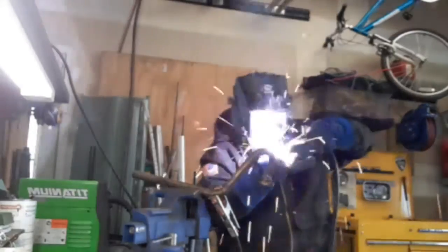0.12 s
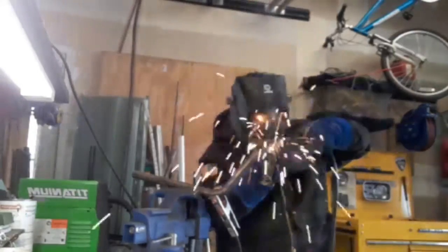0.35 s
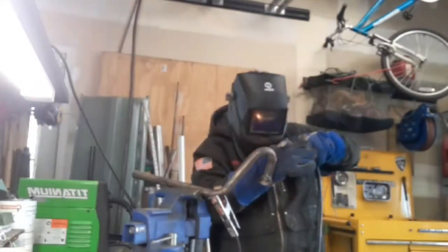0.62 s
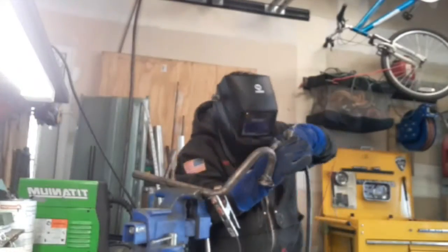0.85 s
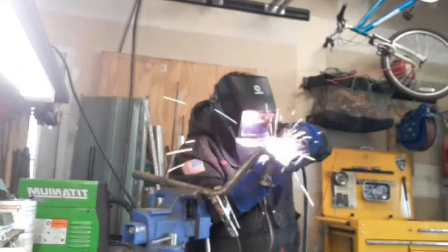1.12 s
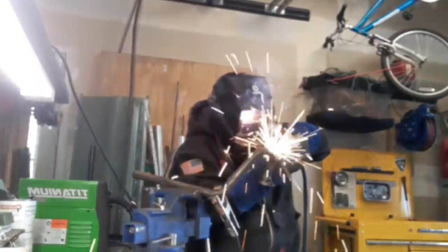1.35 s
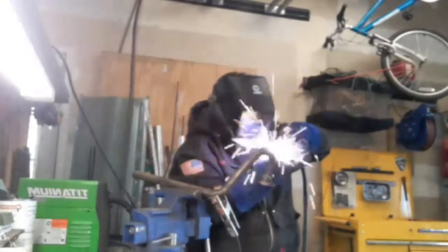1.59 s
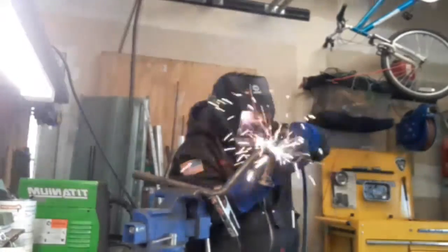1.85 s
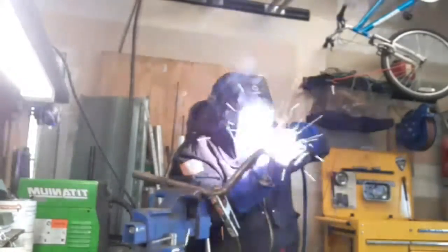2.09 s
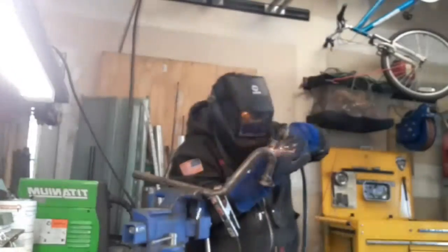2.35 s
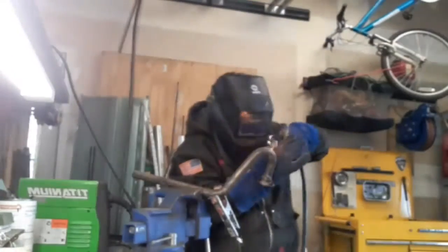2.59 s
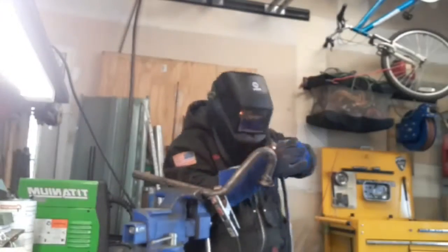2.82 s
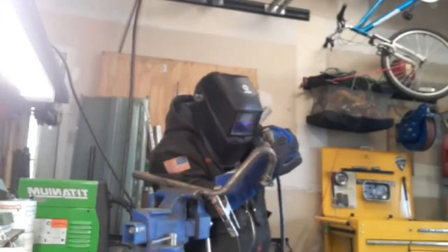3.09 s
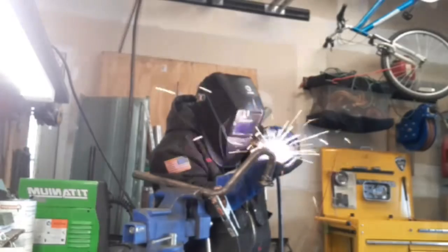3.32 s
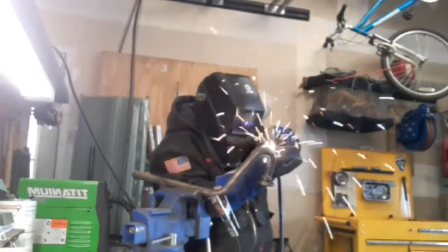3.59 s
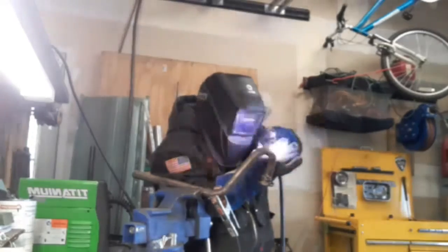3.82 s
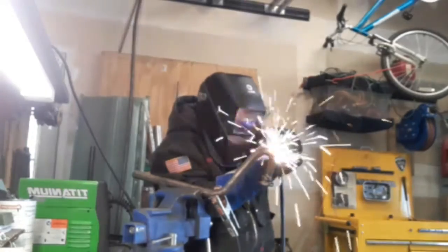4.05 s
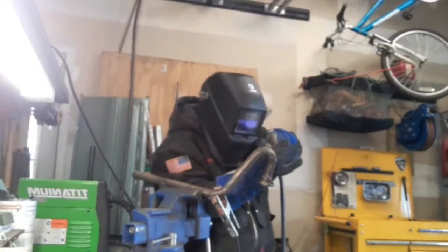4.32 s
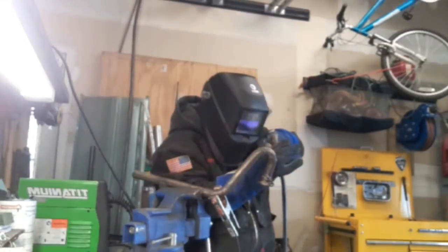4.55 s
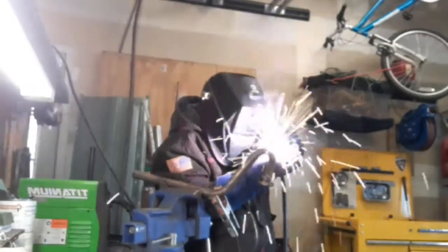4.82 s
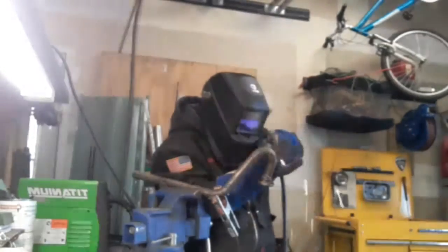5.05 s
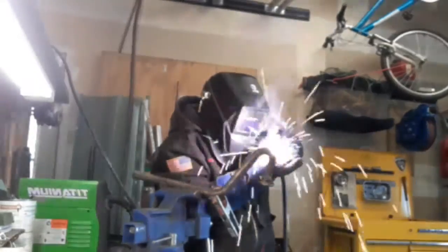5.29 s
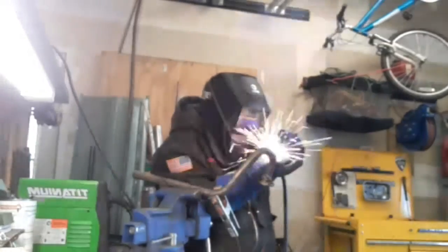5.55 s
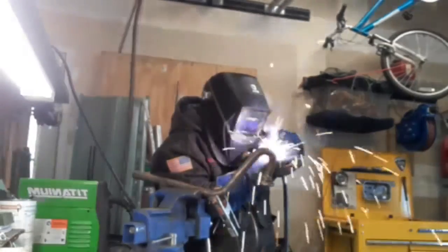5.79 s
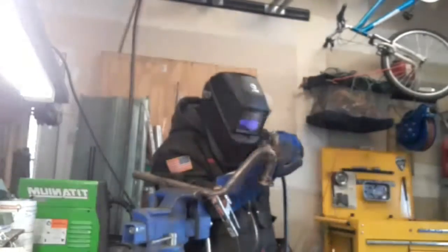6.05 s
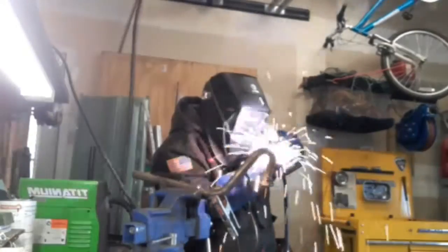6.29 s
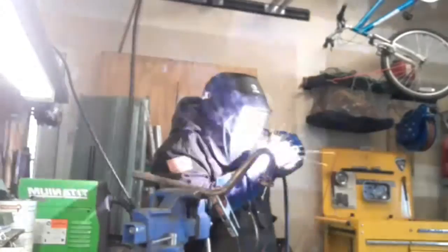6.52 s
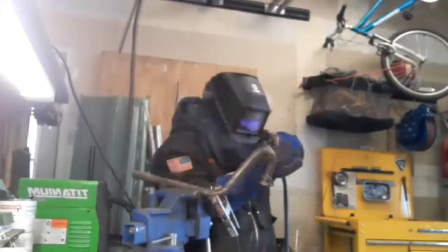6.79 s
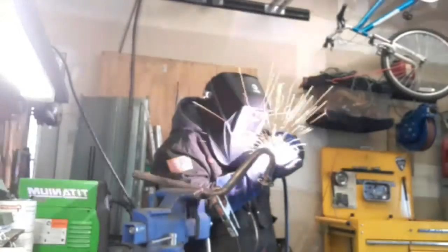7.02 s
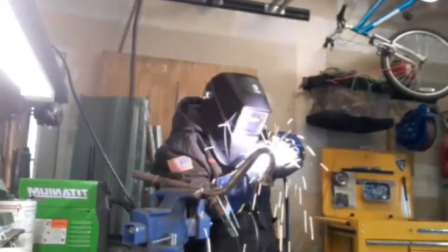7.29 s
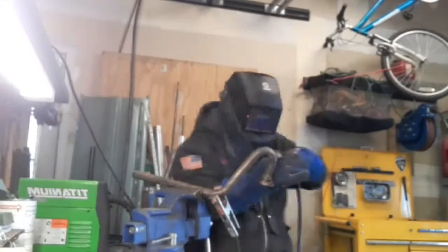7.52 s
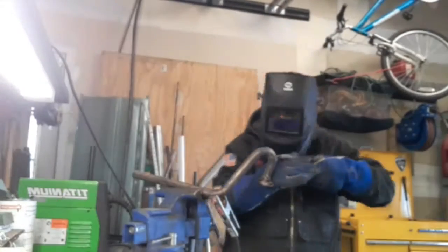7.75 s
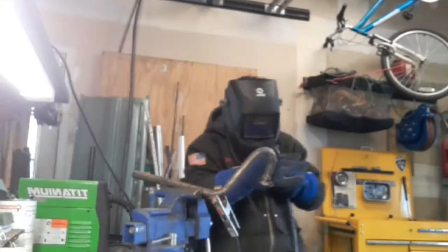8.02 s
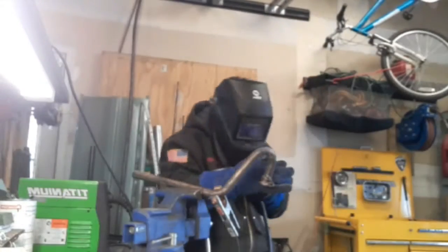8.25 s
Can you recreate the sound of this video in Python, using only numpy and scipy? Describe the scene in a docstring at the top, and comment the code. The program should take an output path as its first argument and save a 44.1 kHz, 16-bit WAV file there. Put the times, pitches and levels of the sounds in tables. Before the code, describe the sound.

Close welding arc spits and crackles in short, ragged bursts over a steady humming fan with a faint whine, in a garage.

```python
"""A wire-feed welder tacks a steel pipe in a garage, close to the microphone, over a humming, whining fan.
It opens on the arc: random hiss, with spits and thumps as short circuits of the wire blow open.
In the first pause a sleeve rustles; bursts resume at 1.2 s, and at 2.5 s the wire knocks on the pipe.
After a faint rustle at 3 s the bursts go on to 7.4 s, coloured by the pipe's rings and nearby echoes.
Then the fan, made of shaped noise and sines, is left with soft rustles, a stronger whine and a low rumble."""
import sys
import numpy as np
from scipy import signal
from scipy.fft import rfft, irfft
from scipy.io import wavfile
from scipy.ndimage import minimum_filter1d

SR = 44100
rng = np.random.default_rng(int(sys.argv[2]) if len(sys.argv) > 2 else 0)


def level_to_linear(level):
    """Convert decibel levels to linear amplitude factors, elementwise."""
    exponent = np.asarray(level, float) / 20
    return 10 ** exponent


def unload_audio(sound):
    """Save the sound as a 16-bit wav file, at the path given as the first command line argument."""
    columns = np.transpose(np.atleast_2d(sound))
    # keep every value between -1 and 1, then stretch to whole-number steps
    steps = np.round(np.clip(columns, -1, 1) * 32767)
    wavfile.write(sys.argv[1], SR, steps.astype(np.int16))


N = 369558

# All levels below are at the source, ahead of pipe, room and gain control.
# air rush of the fan: (frequency [Hz], relative spectral level [dB])
RUSH_SPECTRUM = [(18, -55), (40, -36), (175, -26), (300, -17), (400, -12), (710, -21.5), (1030, -25),
                 (1470, -31), (1930, -34), (4300, -35.5), (10100, -49), (12600, -43), (15800, -45)]
# resonances of the machine case: (frequency [Hz], width [Hz], lift [dB])
CASE_RESONANCES = [(366, 29.6, 6.5), (445, 32, 5), (648, 20, 2.5), (1807, 40, 8), (2115, 64, 8.5),
                   (2230, 82, 3), (2700, 30, 6), (3330, 90, 4), (4400, 150, 3), (12550, 380, 7.5)]
# blade-passing tone and its octave: (frequency [Hz], relative level [dB])
BLADE_TONES = [(523.5, -0.5), (1047, -23)]
# tones of the fan: (time [s], blade tone level [dB], motor whine level [dB])
FAN_LEVELS = [(0, -52, -67), (1.1, -49.5, -65.5), (3, -50.5, -67), (5, -47.5, -64.5), (7.6, -47, -65),
              (7.9, -47.5, -74), (8.08, -47, -62), (8.3, -47, -60), (8.38, -46.5, -68)]
# rumble as the welder straightens up: (time [s], level [dB], half length [s])
STRAIGHTENING = (8.08, -66, .19)
# sleeve rustles: (time [s], swell level [dB], nominal length [s])
SLEEVE_RUSTLES = [(0.768, -36, 0.029), (0.839, -38.5, 0.033), (3.025, -45, 0.044), (7.912, -50, 0.037),
                  (7.93, -56, 0.25)]
# colour as the torch moves along the pipe:
# (time [s], lower ring [dB], upper ring [dB], top ring [dB], lows [dB], mids [dB])
TORCH_POSITIONS = [(0, 3, -3, 1, 4, 1), (1.3, 3, -5, -9, 0, 0), (2.4, 4, -3, -6, 1, 3.5),
                   (3, -8, 5, -7, -1, -2), (4.5, -10, 3, -3, 0, -2), (5.7, -5, 4, -3, 0, -2),
                   (7.4, -5, -2, -8, -1, -4)]
# lower, upper and top ring of the pipe: (frequency [Hz], width [Hz])
PIPE_RINGS = [(2220, 250), (2720, 130), (14800, 350)]
# the wire stubs hard against the pipe: (time [s], level [dB])
WIRE_STUB = (2.5003, -13)
# modes of pipe and vice that it sets ringing: (frequency [Hz], relative level [dB], 60 dB decay [s])
KNOCK_MODES = [(215, 0, .04), (500, -4, .025), (730, -8, .025), (950, -10, .025), (1450, -8, .03),
               (2230, -8, .03)]
# the hardest ruptures also push the air: (time [s], relative level [dB])
AIR_THUMPS = [(0.018, -38), (0.0424, -34), (0.0533, -36), (0.0798, -30), (0.1034, -32), (0.1443, -39),
              (0.1946, -35), (0.2213, -35), (0.2287, -38), (0.2456, -34), (0.2855, -30), (0.3385, -36),
              (0.3592, -37), (1.4171, -33), (2.0184, -37), (2.5172, -34), (4.1009, -39)]
# the arc burns until the wire shorts out or the trigger is let go:
# (strike time [s], out time [s], sizzle level at strike [dB], sizzle level at out [dB])
ARC_BURNS = [(0.0, 0.02, -26, -26), (0.022, 0.325, -36, -35), (0.336, 0.465, -33, -35),
             (1.215, 1.303, -35, -40), (1.309, 1.39, -32, -37), (1.405, 1.505, -29, -31),
             (1.673, 1.818, -33, -37), (1.928, 2.095, -33, -31), (2.187, 2.235, -30, -33),
             (2.253, 2.345, -31, -33), (2.496, 2.572, -31, -33), (2.582, 2.65, -31, -32),
             (2.683, 2.718, -33, -35), (3.396, 3.466, -36, -33), (3.662, 3.84, -35, -37),
             (3.956, 3.985, -34, -35), (4.007, 4.068, -34, -34), (4.1, 4.125, -31, -35),
             (4.144, 4.2, -31, -35), (4.714, 4.779, -31, -33), (4.798, 4.852, -30, -36),
             (4.871, 5.086, -33, -31), (5.225, 5.277, -31, -33), (5.299, 5.49, -32, -34),
             (5.655, 5.728, -33, -36), (5.736, 5.962, -33, -35), (5.972, 6.043, -32, -31),
             (6.255, 6.452, -33, -36), (6.647, 6.797, -33, -35), (7.135, 7.433, -32, -31)]
# hiss of the arc: (frequency [Hz], relative spectral level [dB])
ARC_SPECTRUM = [(35, -40), (70, -10), (170, 2), (700, -5), (1100, -6), (1900, -5.5), (3200, -3), (6500, -5),
                (9500, -10), (12000, -3), (15800, -3)]
# resonances of pipe, vice and nozzle: (frequency [Hz], width [Hz], lift [dB])
WORK_RESONANCES = [(5200, 300, 4), (8370, 690, 6), (10800, 250, 4), (11700, 150, 3), (12700, 500, 3)]
# loud short circuits blowing open:
# (time [s], bright level [dB], body level over bright [dB], time until bright is 6 dB down [s])
LOUD_SPITS = [(0.0405, -28, 1, .004), (0.0522, -28, -2, .003), (0.0788, -23, -3, .003),
              (0.1018, -23, -3, .0035), (0.1432, -23, -3.5, .0035), (0.1616, -22, -5.5, .004),
              (0.1936, -21, -3.5, .0035), (0.221, -19, -4.5, .004), (0.2282, -23, -3.5, .0035),
              (0.2444, -24, -2, .004), (0.2589, -26, -3.5, .0045), (0.2849, -20, -.5, .004),
              (0.2983, -26, -3.5, .004), (0.3382, -22, -.5, .0075), (0.3587, -20, -5.5, .004),
              (0.4081, -23, -8.5, .0045), (0.45, -23, -7.5, .004), (0.457, -23, -6.5, .008),
              (1.2167, -26, -7.5, .004), (1.2252, -26, -5, .0035), (1.2377, -28, -8.5, .0145),
              (1.2696, -27, -11, .0065), (1.31, -20, -7.5, .0035), (1.3594, -24, -5.5, .005),
              (1.4075, -30, 1, .006), (1.4153, -20, -2.5, .004), (1.4632, -23, -6.5, .0045),
              (1.4766, -21, -10, .0035), (1.4861, -22, -4.5, .0035), (1.6745, -28, -6, .004),
              (1.6837, -26, -8.5, .009), (1.7301, -25, -8.5, .014), (1.7969, -24, -2.5, .004),
              (1.9381, -26, -4.5, .0085), (1.96, -24, -7.5, .0045), (1.972, -21, -7.5, .0055),
              (2.0112, -21, -2, .003), (2.0178, -22, 1, .004), (2.0429, -22, -8.5, .004),
              (2.0559, -26, -8, .005), (2.0773, -16, -8.5, .0035), (2.0868, -23, -5.5, .004),
              (2.193, -17, -7.5, .0035), (2.2165, -22, -5.5, .0085), (2.2668, -25, -7.5, .005),
              (2.279, -25, -8, .004), (2.334, -27, -5, .004), (2.4963, -25, 8.5, .008),
              (2.5168, -23, -2.5, .0045), (2.5881, -21, -6.5, .006), (2.684, -29, -1, .008),
              (3.4098, -25, -1.5, .0065), (3.663, -26, -6.5, .003), (3.6677, -22, -6.5, .004),
              (3.6995, -24, -5.5, .004), (3.7894, -25, -8.5, .0185), (3.9575, -32, 7, .0075),
              (4.0079, -22, -3.5, .01), (4.0528, -23, -11, .005), (4.0598, -24, -8.5, .005),
              (4.1005, -25, -1, .006), (4.1082, -23, -7.5, .005), (4.1456, -22, -7.5, .0045),
              (4.7253, -29, -9, .012), (4.7732, -25, -9.5, .0095), (4.7991, -20, -7.5, .004),
              (4.8066, -22, -8.5, .003), (4.8205, -25, -10, .005), (4.847, -18, -9.5, .0035),
              (4.8719, -24, -1, .0045), (4.8814, -23, -6.5, .005), (4.9168, -25, -7.5, .0045),
              (5.0291, -27, -11, .011), (5.2331, -24.5, -5.5, .005), (5.2556, -24, -4.5, .0125),
              (5.2995, -26, -6.5, .012), (5.3768, -25, -8.5, .008), (5.4237, -21, -5.5, .0045),
              (5.6561, -25, -.5, .005), (5.6651, -23, -3.5, .004), (5.745, -28, -4, .004),
              (5.7898, -27, -7.5, .006), (5.8148, -21, -6.5, .0045), (5.8475, -25, -5, .004),
              (5.8751, -24, -3.5, .005), (5.9809, -23, -.5, .012), (6.0288, -20, -3.5, .004),
              (6.038, -25, -5, .003), (6.2618, -26, -7.5, .005), (6.3057, -24, -4.5, .005),
              (6.3466, -24, -3.5, .008), (6.4264, -26, -6.5, .006), (6.6529, -26, -5.5, .011),
              (6.6785, -26, -5, .005), (6.7227, -22, -4.5, .005), (6.7457, -23, -6.5, .008),
              (6.7696, -23, -6.5, .006), (6.7961, -25, -7, .003), (7.1438, -24, -3.5, .012),
              (7.1857, -23, -7.5, .0105), (7.2435, -24, -5.5, .008), (7.281, -26, -6.5, .006),
              (7.3533, -25, -8.5, .014), (7.3977, -26, -6.5, .011)]


def in_time(rows):
    """Join each column by straight lines, one value a sample."""
    s, *columns = np.transpose(rows)
    return [np.interp(np.arange(N) / SR, s, column) for column in columns]


def band(x, low_hz, high_hz):
    """Keep what lies between two frequencies."""
    return signal.sosfilt(signal.butter(2, [low_hz, high_hz], "band", fs=SR, output="sos"), x)


def drift(rate_hz):
    """Slow random wandering with spread 1, from noise through two equal lowpasses."""
    r = np.exp(-2 * np.pi * rate_hz / SR)
    slow = signal.lfilter([1], [1, -2 * r, r * r], rng.standard_normal(N + SR))[SR:]
    return slow / slow.std()


def coloured(spectrum, peaks, low_hz, high_hz):
    """Noise with a spectrum and resonant humps; rms 1 between low_hz and high_hz."""
    hz = np.maximum(np.arange(N // 2 + 1) * SR / N, 1)
    spectrum_hz, spectrum_db = np.transpose(spectrum)
    db = np.interp(np.log(hz), np.log(spectrum_hz), spectrum_db)
    for at, width, lift in peaks:
        db = db + lift / (1 + (2 * (hz - at) / width) ** 2)
    noise = irfft(rfft(rng.standard_normal(N)) * level_to_linear(db), N)
    return noise / band(noise, low_hz, high_hz).std()


def fan():
    """Air rushing through the case, the blade-passing tone with its octave, and a wavering motor whine."""
    rush_db, whine_hz = -48, 1803
    rush = level_to_linear(rush_db + .8 * drift(9.4)) * coloured(RUSH_SPECTRUM, CASE_RESONANCES, 270, 496)
    turns = np.arange(N) / SR + .0002 * drift(3.37)   # running time in s, slightly unsteady
    blade_db, whine_db = in_time(FAN_LEVELS)
    blades = sum(level_to_linear(db) * np.sin(2 * np.pi * hz * turns) for hz, db in BLADE_TONES)
    whine = level_to_linear(whine_db + .9 * drift(5)) * np.sin(2 * np.pi * whine_hz * turns)
    tones = level_to_linear(blade_db + 2 * drift(9)) * blades + whine
    return rush + np.sqrt(2) * tones   # sine peaks from rms levels


def rumble():
    """A soft, uneven swell of low noise as the welder straightens up."""
    s, db, half = STRAIGHTENING
    low = band(rng.standard_normal(N), 35, 160)
    swell = np.exp(-((np.arange(N) / SR - s) / half) ** 4)
    return level_to_linear(db + 2.5 * drift(8)) * swell * low / low.std()


def rustles():
    """Leather rubbing: short soft swells of mid noise."""
    t = np.arange(N) / SR
    swell = np.zeros(N)
    for s, db, length in SLEEVE_RUSTLES:
        swell += level_to_linear(db) * np.exp(-((t - s - length / 3) / (length / 2)) ** 2)
    return swell * band(rng.standard_normal(N), 820, 5100)


def garage(x, t60, wall_hz):
    """A dense tail of reflections, dulled by the walls."""
    t = np.arange(SR // 2) / SR
    tail = rng.standard_normal(len(t)) * level_to_linear(-60 * t / t60) * (t > .003)
    tail = signal.sosfilt(signal.butter(1, wall_hz, fs=SR, output="sos"), tail)
    return signal.fftconvolve(x, tail / np.sqrt(np.sum(tail ** 2)))[:N]


def near_echoes(x):
    """Vice, glove and helmet throw the treble back; the echo pattern is new at every strike."""
    count, longest_s, echo_db = 6, .0025, -17
    strikes = [round(row[0] * SR) for row in ARC_BURNS] + [N]
    treble, out = band(x, 2900, 17000), x.copy()
    for start, end in zip(strikes, strikes[1:]):
        taps = np.zeros(round(longest_s * SR))
        taps[rng.integers(8, len(taps), count)] = level_to_linear(echo_db) * rng.choice([-1, 1], count)
        part = treble[start:end]
        echoes = np.convolve(part, taps)[:end - start]
        out[start:end] += echoes - np.sum(taps ** 2) / 2 * part   # makes room for the added energy
    return out


def pipe(x, share):
    """Each ring of the pipe lifts its own pitch; lows and mids follow the torch."""
    *rings_db, lows_db, mids_db = in_time(TORCH_POSITIONS)
    out = x + (level_to_linear(lows_db) - 1) * band(x, 30, 400)
    out = out + (level_to_linear(mids_db) - 1) * band(x, 650, 1350)
    for (hz, width), db in zip(PIPE_RINGS, rings_db):
        r = np.exp(-np.pi * width / SR)
        ring = signal.lfilter([1 - r, 0, r - 1], [1, -2 * r * np.cos(2 * np.pi * hz / SR), r * r], x)
        out = out + share * level_to_linear(db) * ring
    return out


def stub():
    """One knock of the wire rings briefly in the modes of pipe and vice."""
    s, knock_db = WIRE_STUB
    t = np.maximum(np.arange(N) / SR - s, 0)
    rings = np.zeros(N)
    for hz, db, t60 in KNOCK_MODES:
        rings += level_to_linear(knock_db + db - 60 * t / t60) * np.sin(2 * np.pi * hz * t)
    return band(rings, 90, 5000)


def thumps():
    """A short dull dip in pressure, then at once a slow rebound."""
    rebound_s = .0025   # time constant
    dips, pushes = np.zeros((2, N)) + 1e-18
    for s, db in AIR_THUMPS:
        dips[round((s + .0002) * SR)] = -level_to_linear(db)
        pushes[round((s + .0005) * SR)] = level_to_linear(db)
    dip = band(dips, 180, 4200)
    slow = signal.lfilter([1], [1, -np.exp(-1 / (rebound_s * SR))], pushes)
    return level_to_linear(35) * dip + level_to_linear(8.5) * band(slow, 90, 900)


def burning():
    """Strength of the arc: on at once, choked before each loud rupture, cooling when it goes out."""
    choke_s, choke_db, cooling_s = .005, -7, .0055
    level = np.zeros(N)
    for strike, out, first_db, last_db in ARC_BURNS:
        on = np.arange(max(round(strike * SR), 0), round(out * SR))
        level[on] = level_to_linear(np.linspace(first_db, last_db, len(on)))
    for s, *_ in LOUD_SPITS:
        level[round((s - choke_s) * SR):round(s * SR)] *= level_to_linear(choke_db)
    keep = np.exp(-1 / (cooling_s * SR))
    glow = signal.lfilter([1 - keep], [1, -keep], level)   # hot plasma also fills in the chokes
    return np.maximum(level, glow)


def sizzle(level):
    """The burning arc: hiss that flickers and is studded with small crackles."""
    flicker_db, crackles_per_s, crackle_db, crackle_t60_s = 1.8, 160, 1.0, .011
    born = (rng.random(N) < crackles_per_s / SR) * level_to_linear(crackle_db + 3 * rng.standard_normal(N))
    crackle = signal.lfilter([1], [1, -level_to_linear(-60 / (crackle_t60_s * SR))], born)
    grain = level_to_linear(flicker_db * drift(50)) + crackle
    grain = grain / np.sqrt(np.mean(grain ** 2))
    return level * grain * coloured(ARC_SPECTRUM, WORK_RESONANCES, 2180, 17600)


def small_spits(level):
    """Rows like those of the loud ruptures, at random moments, scaled by the arc strength then."""
    per_s, over_sizzle_db, spread_db = 9, 3.5, 2.0
    body_db, fall_s = -8, .005   # body over bright, time until 6 dB down
    s = rng.uniform(0, N / SR - .2, round(per_s * N / SR))
    chance = rng.standard_normal((len(s), 3))
    arc_db = 20 * np.log10(level[(s * SR).astype(int)] + 1e-9)
    db = arc_db + over_sizzle_db + spread_db * chance[:, 0]
    return list(zip(s, db, body_db + 2.5 * chance[:, 1], fall_s * np.exp(.4 * chance[:, 2])))


def spits(rows):
    """Each rupture is two sharp cracks in a sudden burst of bright noise over a duller, shorter body."""
    crack_db, spread_db = 13.5, 2.0   # impulse over the spit
    gap_s, second_db = .0014, -2   # typical wait for the second crack, its level against the first
    body_share = .7   # body length over bright length
    noise = coloured(ARC_SPECTRUM, WORK_RESONANCES, 3090, 16630)
    bright, body = band(noise, 3200, 16000), band(noise, 350, 4030)
    body = body / body.std()
    ragged = level_to_linear(2.5 * drift(1500))   # the plasma tears unevenly
    out, cracks, t = np.zeros(N), np.zeros(N) + 1e-18, np.arange(SR // 10) / SR
    attack = np.minimum(t / .0002, 1)
    for (s, db, body_db, length), chance in zip(rows, rng.standard_normal((len(rows), 3))):
        start = round(s * SR)
        part = slice(start, start + len(t))
        fade = attack * np.exp(-np.log(2) * (t / length) ** 1.9)
        body_fade = attack * np.exp(-np.log(2) * (t / (body_share * length)) ** 1.9)
        burst = fade * bright[part] + level_to_linear(body_db) * body_fade * body[part]
        out[part] += ragged[part] * level_to_linear(db) * burst
        second = start + round(gap_s * np.exp(chance[2] / 4) * SR)
        cracks[[start, second]] -= level_to_linear(db + crack_db + spread_db * chance[:2] + [0, second_db])
    return out + band(cracks, 300, 15000)


def scene():
    """The arc at the pipe, close by, with its room tail, over rustles, rumble and fan."""
    soft_share = .6   # hiss and thumps stir the pipe less than the spits do
    level = burning()
    hiss = near_echoes(pipe(sizzle(level), soft_share))
    ruptures = near_echoes(pipe(spits([*LOUD_SPITS, *small_spits(level)]), share=1))
    arc = hiss + ruptures + pipe(thumps(), soft_share) + stub()
    room = level_to_linear(-17) * garage(arc, t60=.21, wall_hz=9600)
    return (arc + room + rustles() + rumble() + fan())[None]


def even_out(x):
    """Gain control: the gain drops soon under the arc, holds, then creeps up in pauses."""
    even_db, share, most_gain_db = -30, .66, 6.5   # loudness left alone, gain dB per dB quieter, top gain
    hold_s, slide_db_per_s, lag_s = .22, 21, .03   # slide is the fall of the tracked loudness
    settled_db = -27   # tracked loudness at the start
    fast, slow = np.exp(-1 / (.1 * SR)), np.exp(-1 / (lag_s * SR))
    power = signal.lfilter([1 - fast], [1, -fast], x[0] ** 2, zi=[level_to_linear(2 * settled_db)])[0]
    hold = round(hold_s * SR) // 2
    held_db = -minimum_filter1d(-10 * np.log10(power), size=2 * hold + 1, origin=hold, mode="nearest")
    slide = slide_db_per_s * np.arange(N) / SR
    loud_db = np.maximum.accumulate(held_db + slide) - slide - settled_db
    lagged_db = signal.lfilter([1 - slow], [1, -slow], loud_db)
    gain_db = share * (even_db - settled_db - lagged_db)
    return x * level_to_linear(np.minimum(gain_db, most_gain_db))


def low_pass(x):
    """Removes everything above the highest recorded frequency."""
    return signal.sosfilt(signal.butter(12, 16870, fs=SR, output="sos"), x)


def record(dry):
    """The gain is evened out, then a steep lowpass cuts the top."""
    top_cut = signal.cheby2(18, 30, 15900, fs=SR, output="sos")
    mix = signal.sosfilt(top_cut, even_out(dry))
    return low_pass(mix)


dry = scene()
out = record(dry)
unload_audio(out)
```